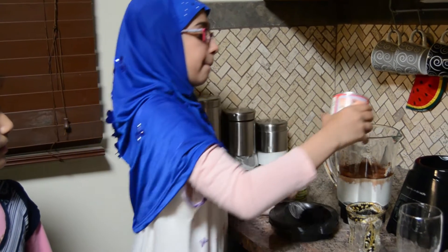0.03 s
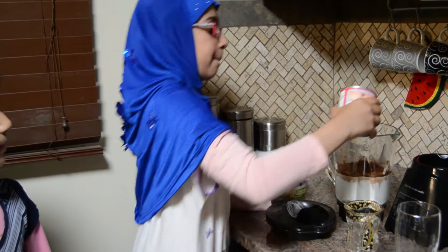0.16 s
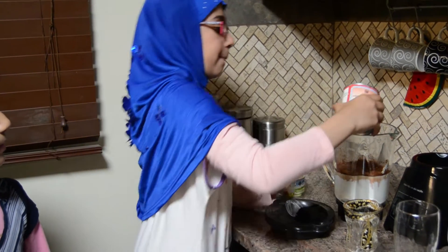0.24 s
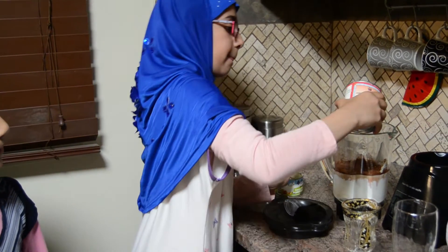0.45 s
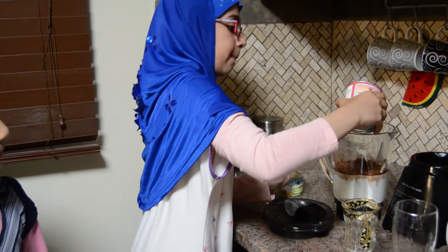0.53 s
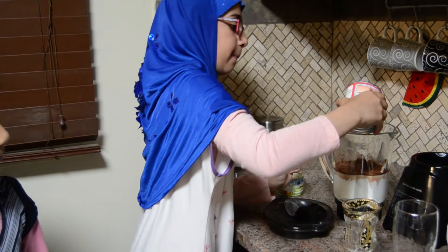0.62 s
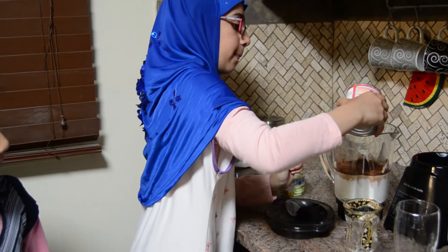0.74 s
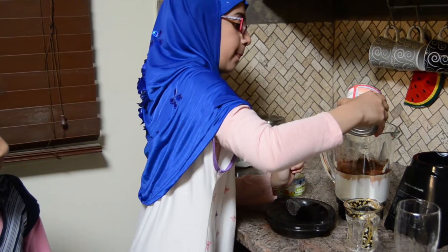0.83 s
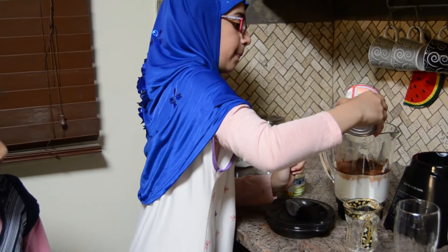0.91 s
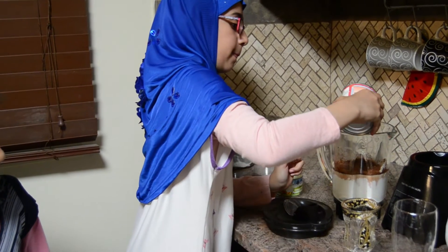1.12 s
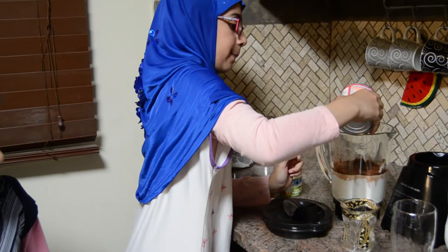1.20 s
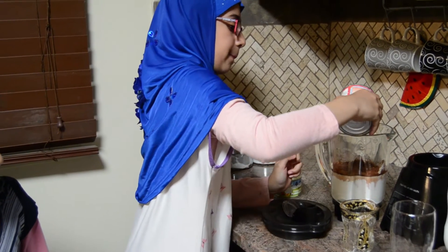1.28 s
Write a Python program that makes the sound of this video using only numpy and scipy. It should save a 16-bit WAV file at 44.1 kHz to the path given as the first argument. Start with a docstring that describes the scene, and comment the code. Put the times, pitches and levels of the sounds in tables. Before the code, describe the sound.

A full metal can clanks against the rim of a glass blender jar. The glass rings briefly, then the can settles with a faint click. The sound is close, in a kitchen with dull air noise and a low hum.

```python
"""A full metal can, held in the hand, touches a glass blender jar's rim, clanks and settles with a click.
Each impact excites damped normal modes: the can's filled body thuds, its thin wall clacks, the glass rings.
Contact noise adds cracks and thin ticks, and the jar's base bumps softly on the counter.
A tiled kitchen reflects the sounds over dull air noise and a low mains hum."""
import sys
import numpy as np
from scipy import signal
from scipy.io import wavfile
from scipy.ndimage import uniform_filter1d

SR = 44100
rng = np.random.default_rng(int(sys.argv[2]) if len(sys.argv) > 2 else 0)


def master_out(mix):
    """Clip the mix to full scale and print it as 16-bit PCM to the path in sys.argv[1]."""
    frames = np.transpose(np.atleast_2d(mix))
    ceiling = np.clip(frames, -1, 1)
    pcm = np.round(ceiling * 32767).astype(np.int16)
    wavfile.write(sys.argv[1], SR, pcm)


N = 59535
T = np.arange(int(.8 * SR)) / SR  # time since an impact, s

# spectrum of the air noise: frequency_hz, relative_density_db
AIR_SPECTRUM = [(25, -6.5), (42, -23.5), (85, -12.5), (170, -2.5), (260, -1.5), (340, -6), (550, -6.5),
                (1100, -9), (2200, -17.5), (3200, -27.5), (6000, -41.5), (11000, -47), (12500, -56)]
# mains harmonics: pitch_hz, rms_level_db
HUM_LINES = [(59.8, -70.5), (119.8, -63.5), (180, -66.5), (241, -72)]
# reflections from counter, tiles and cupboards: delay_s, gain
REFLECTIONS = [(.0048, 0.28), (.0088, 0.29), (0.0144, 0.18)]
# reverberation time of the kitchen: frequency_hz, t60_s
ROOM_DECAY = [(150, 0.93), (500, 0.34), (1400, 0.4), (3500, 0.37), (10000, 0.22)]
# bumps of the jar's base: start_s, level_db
BASE_BUMPS = [(.31, -46), (.445, -54.5), (.48, -47)]
# modes of the base: pitch_hz, level_db, t60_s
BASE_MODES = [(123.7, -6.5, 0.32), (165.7, 10, 0.12), (189.6, -4, 0.25)]
# the rim's edge skipping on the glass: start_s, level_db
RIM_SKIPS = [(0.1102, -48), (0.238, -39), (0.4476, -44.5)]
# spectrum of a tick: frequency_hz, relative_level_db
TICK_SPECTRUM = [(300, -28), (1700, 6), (2800, -1.5), (4000, -5), (5300, -9.5), (6500, -19.5),
                 (11000, -22.5), (13000, -33.5)]
# the rim catching as the can settles: start_s, level_db
RIM_CATCHES = [(.4415, -40), (.4465, -28)]
# modes of the rim: pitch_hz, level_db, t60_s
RIM_MODES = [(613.6, 0, 0.08), (706, 9.5, 0.06), (807, -7, 0.12), (865, -8.5, 0.052), (1902, -2.5, 0.057),
             (2744, -10, 0.038), (3910, -21.5, .06)]
# spectrum of metal striking glass: frequency_hz, relative_level_db
CRACK_SPECTRUM = [(100, -38.5), (250, -21), (400, -13), (800, -9), (1150, -0.5), (1400, -2.5), (1800, -1.5),
                  (2450, -2), (2900, -13.5), (3400, -15), (4200, -26.5), (6000, -34), (10500, -43),
                  (13500, -58)]
# two sets of modes of the glass: pitch_hz, level_db, t60_s
GLASS_MODES_A = [(1055, 0, .36), (1085, -1, .13), (1690, -9, .16), (2148, -16, .33), (3435, -23, .36)]
GLASS_MODES_B = [(598, -11, .25), (1165, -3, .27), (1184, -3, .33), (1540, -12, .2), (1922, -15, .35)]
# modes of the can's filled body, one list each: pitch_hz, level_db, t60_s
CAN_BODY_HZ = [323, 419, 473, 500, 538, 660, 695, 831]
CAN_BODY_DB = [-15.5, -18.5, -2, -0.5, 3.5, 4.5, -2, -11.5]
CAN_BODY_T60_S = [0.15, 0.31, .19, 0.23, 0.1, 0.067, 0.11, 0.22]
# modes of its thin wall (the broad one at 2250 Hz is the snap), one list each: pitch_hz, level_db, t60_s
CAN_WALL_HZ = [970, 1160, 1600, 1790, 1945, 2133, 2223, 2250, 2372, 2443, 2540, 3257]
CAN_WALL_DB = [-13, -3, -15, -6.5, -1, -5, -4.5, 5.5, -6, -4.5, -11.5, -19.5]
CAN_WALL_T60_S = [0.12, 0.081, 0.15, .17, 0.044, 0.052, 0.085, 0.016, 0.053, 0.075, 0.1, 0.065]
# impacts of can on jar: start_s, body_db, wall_db, crack_db, glass_db, place_on_rim_rad
IMPACTS = [(0.1121, -56.5, -36, -47, -62, .8), (0.1174, -23.5, -36.5, -43, -62.5, 1.1),
           (0.2037, -23.5, -31.5, -29, -54, .8), (.2061, -9.5, -9.5, -20.5, -36.5, 0.68),
           (.2093, -10.5, -11, -20.5, -41.5, 2.4), (.2402, -17.5, -37, -36.5, -50.5, 0.49),
           (0.2664, -21, -39.5, -44.5, -50.5, 1.1), (.2992, -23.5, -44, -34, -23.5, 0.83),
           (0.3298, -31, -63.5, -51.5, -58, .8), (0.4454, -58, -46.5, -52, -48, 3),
           (.476, -67, -74, -67, -37, 1.53)]


def amp(db):
    """Amplitude grows tenfold for every 20 dB."""
    return 10 ** (np.asarray(db) / 20)


def unit_rms(x):
    """Division by the rms gives a signal unit power."""
    return x / np.sqrt(np.mean(x ** 2) + 1e-20)


def curve_at(points, hz):
    """Interpolation on a logarithmic frequency axis."""
    point_hz, value = np.transpose(points)
    return np.interp(np.log(hz + 1), np.log(point_hz + 1), value)


def add(mix, start_s, sound):
    """Superposition: a sound adds to the mix from its start time."""
    part = mix[max(round(start_s * SR), 0):][:len(sound)]
    part += sound[:len(part)]


def air_noise():
    """Spectrally shaped Gaussian noise: a dull rush, faintly patchy in time and frequency."""
    frames, hz = N // 512 + 5, np.fft.rfftfreq(2048, 1 / SR)
    real, imag, patches = rng.standard_normal((frames, len(hz), 3)).T
    patches = uniform_filter1d(patches, size=14, axis=0)  # across frequency
    patches = uniform_filter1d(patches, size=8, axis=1)  # across time
    level_db = curve_at(AIR_SPECTRUM, hz)[:, None] + 0.94 * unit_rms(patches)
    air = signal.istft((real + 1j * imag) * amp(level_db), nperseg=2048, noverlap=1536)[1][:N]
    return amp(-57) * unit_rms(air)


def mains_hum():
    """Harmonics of the mains frequency waver under slow, random amplitude modulation."""
    t, hum = np.arange(N) / SR, np.zeros(N)
    for hz, db in HUM_LINES:
        waver = 1 + 0.14 * signal.resample(rng.standard_normal(12), N)
        hum += amp(db) * np.sqrt(2) * waver * np.sin(2 * np.pi * (hz * t + rng.random()))
    return hum


def kitchen(direct, room_db, tail_delay_s=.005, tail_rise_s=0.0043):
    """Reverberation: early reflections, then a diffuse tail in which each band decays at its own rate."""
    spacing = 20  # samples per late reflection
    slots = np.arange(0, len(T) - spacing, spacing)
    taps = np.zeros(len(T))
    taps[slots + rng.integers(0, spacing, len(slots))] = rng.choice([-1., 1.], len(slots))
    hz, t, bands = signal.stft(taps, SR, nperseg=256)
    decay = amp(-60 * t / curve_at(ROOM_DECAY, hz)[:, None])
    tail = signal.istft(bands * decay, SR, nperseg=256)[1][:len(T)]
    tail *= 1 - np.exp(-T / tail_rise_s)
    out = direct.copy()
    for delay_s, gain in REFLECTIONS:
        add(out, delay_s, gain * direct)
    add(out, tail_delay_s, amp(room_db) * signal.fftconvolve(direct, tail / np.linalg.norm(tail))[:N])
    return out


def ring(modes, rise_s):
    """Damped normal modes build up over the time of contact; little radiates below the lowest one."""
    tone = sum(amp(db - 60 * T / t60) * np.sin(2 * np.pi * hz * T) for hz, db, t60 in modes)
    onset = 1 - np.exp(-T / rise_s)
    lowest_hz = modes[0][0]
    low_cut = signal.butter(2, .9 * lowest_hz, "high", fs=SR)
    return signal.lfilter(*low_cut, tone * onset) / np.sqrt(len(modes))


def contact_noise(spectrum, t60_s):
    """A hard contact radiates a broadband transient: decaying noise, coloured by a minimum-phase filter."""
    hz = abs(np.fft.fftfreq(2048, 1 / SR))
    log_gain = np.log(amp(curve_at(spectrum, hz)))
    response = np.exp(np.conj(signal.hilbert(log_gain)))
    colour = np.fft.ifft(response).real
    burst = rng.standard_normal(len(T)) * amp(-60 * T / t60_s)
    return signal.fftconvolve(burst, colour / np.linalg.norm(colour))[:len(T)] / 2


def knocks(events, tone):
    """Linear response: each knock on an object gives the same tone, scaled by its strength."""
    out = np.zeros(N)
    for start_s, db in events:
        add(out, start_s, amp(db) * tone)
    return out


def base_bumps():
    """Soft contact with the counter excites the low modes of the jar's base."""
    return kitchen(knocks(BASE_BUMPS, ring(BASE_MODES, rise_s=0.0035)), room_db=-11)


def rim_ticks():
    """The rim's edge skips on the glass, giving bright noise transients without a ring."""
    ticks = np.zeros(N)
    for start_s, db in RIM_SKIPS:
        add(ticks, start_s, amp(db) * contact_noise(TICK_SPECTRUM, t60_s=0.057))
    return kitchen(ticks, room_db=-0.5)


def settling_click():
    """The rim catches as the can settles; its heavily damped modes are heard as a click."""
    return kitchen(knocks(RIM_CATCHES, ring(RIM_MODES, rise_s=0.00046)), room_db=-7.5)


def can_on_jar():
    """Impact excitation: each contact cracks and rings the can's body, its wall and the glass."""
    body, wall, cracks, glass = np.zeros((4, N))
    thud = ring(list(zip(CAN_BODY_HZ, CAN_BODY_DB, CAN_BODY_T60_S)), rise_s=0.0016)
    clack = ring(list(zip(CAN_WALL_HZ, CAN_WALL_DB, CAN_WALL_T60_S)), rise_s=0.00079)
    chime_a, chime_b = (ring(modes, rise_s=0.0013) for modes in (GLASS_MODES_A, GLASS_MODES_B))
    for start_s, body_db, wall_db, crack_db, glass_db, place_rad in IMPACTS:
        add(body, start_s, amp(body_db) * thud)
        add(wall, start_s, amp(wall_db) * clack)
        add(cracks, start_s, amp(crack_db) * contact_noise(CRACK_SPECTRUM, t60_s=0.043))
        # the place of contact shares the blow between the two sets of glass modes
        chime = np.cos(place_rad) * chime_a + np.sin(place_rad) * chime_b
        add(glass, start_s, amp(glass_db) * chime)
    return (kitchen(body, room_db=-13.5) + kitchen(wall, room_db=-9)
            + kitchen(cracks, room_db=1.5) + kitchen(glass, room_db=-7))


def scene():
    """The pressures of the impacts and the background sum in one channel."""
    impacts = settling_click() + base_bumps() + can_on_jar() + rim_ticks()
    return (impacts + air_noise() + mains_hum())[None]


def record(dry, cutoff_hz=14800):
    """Band limiting: a linear-phase low-pass filter removes the highest treble."""
    low_pass = signal.firwin(511, cutoff_hz, window=("kaiser", 9), fs=SR)
    return signal.oaconvolve(dry, low_pass[None], "same")


dry = scene()
out = record(dry)
master_out(out)
```